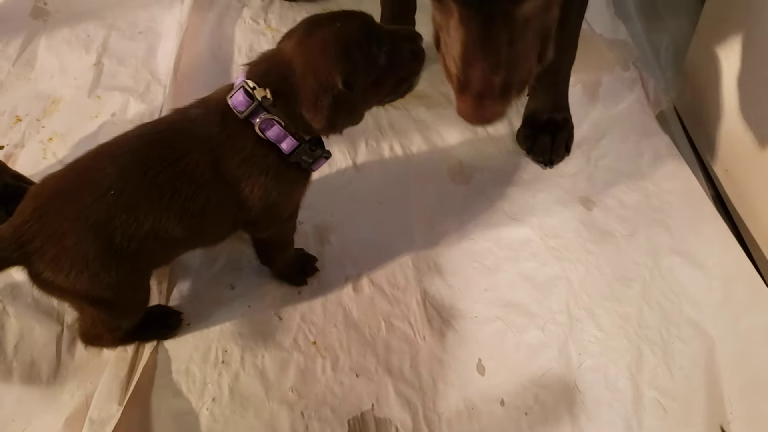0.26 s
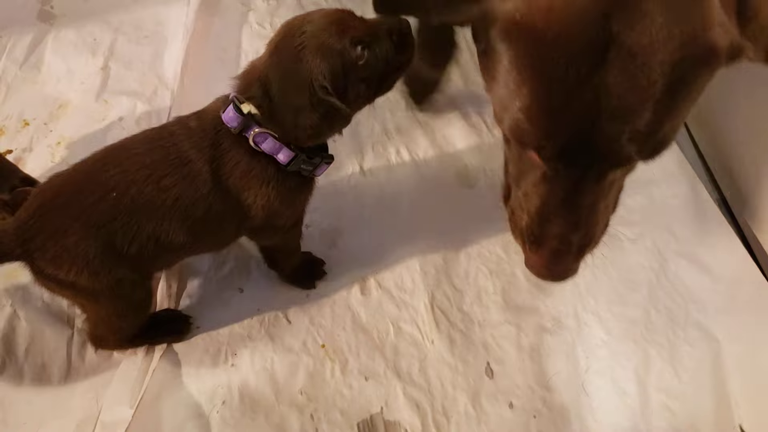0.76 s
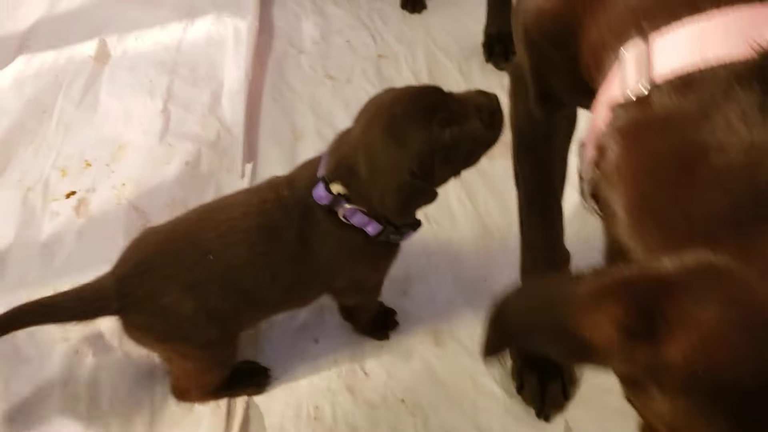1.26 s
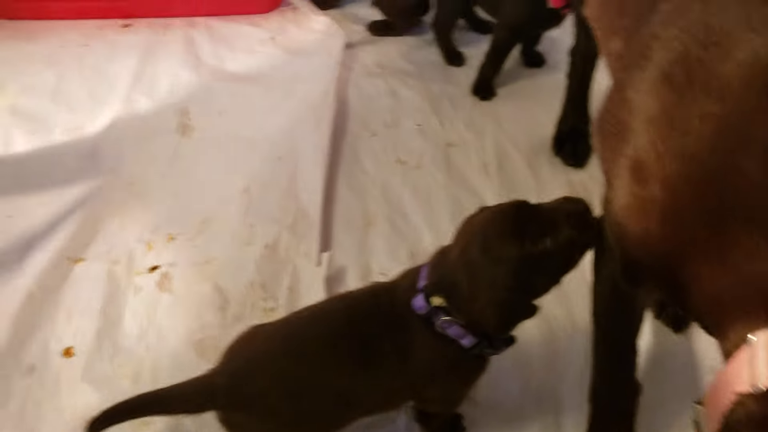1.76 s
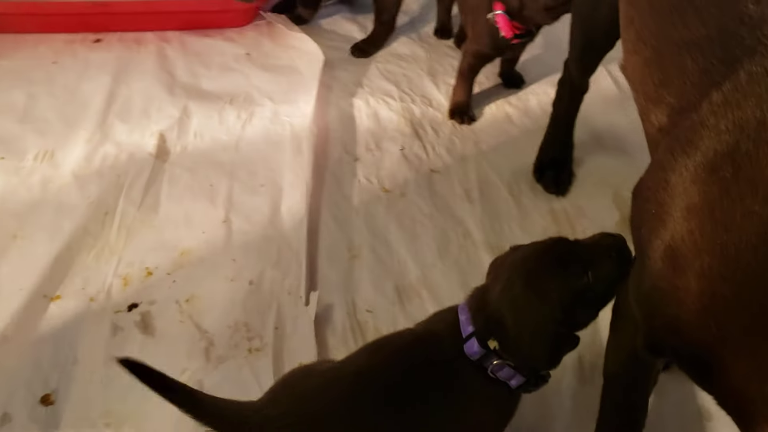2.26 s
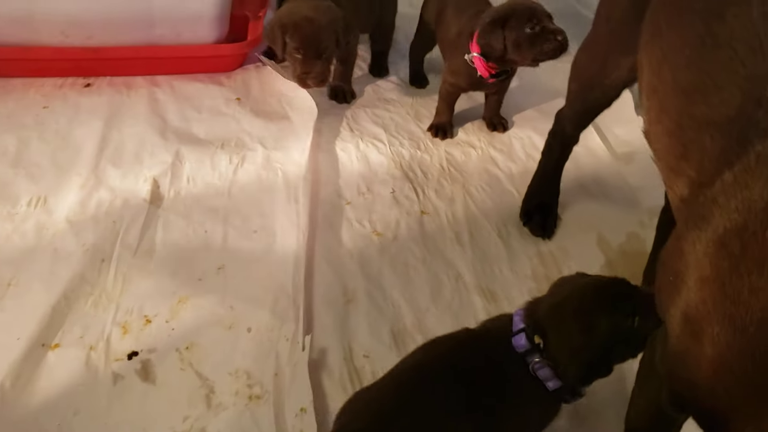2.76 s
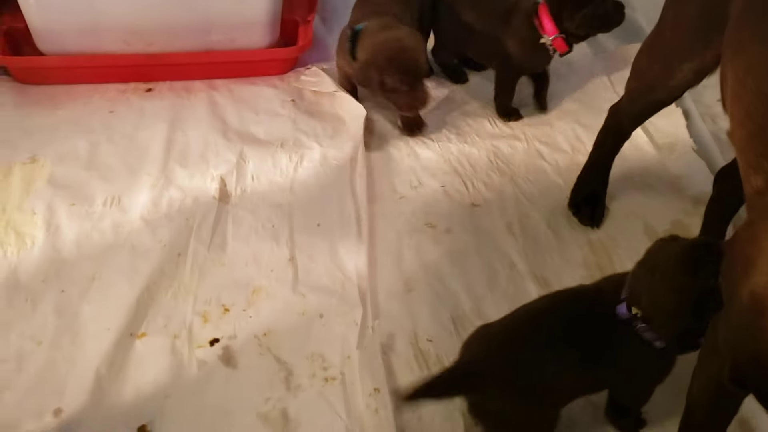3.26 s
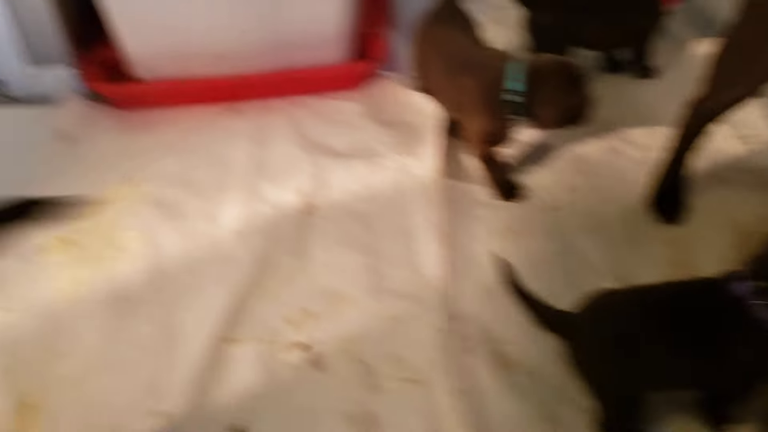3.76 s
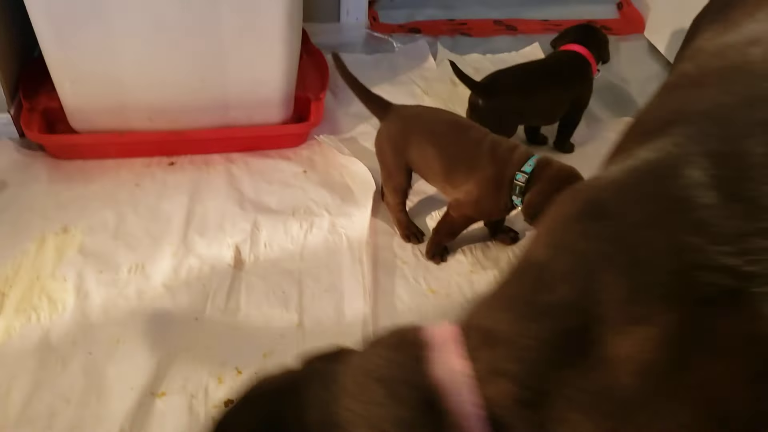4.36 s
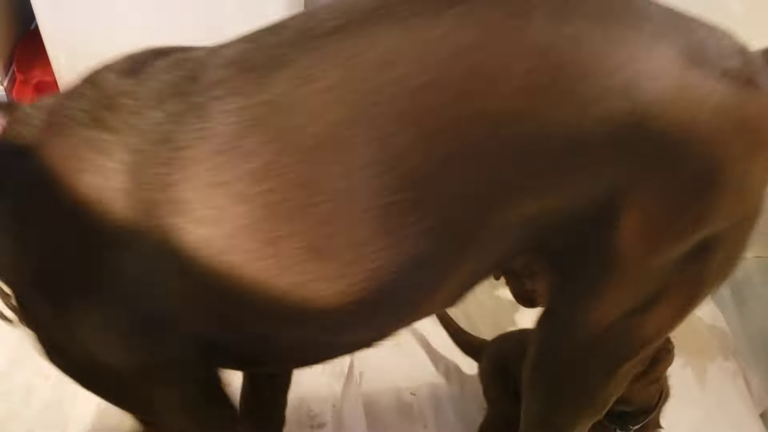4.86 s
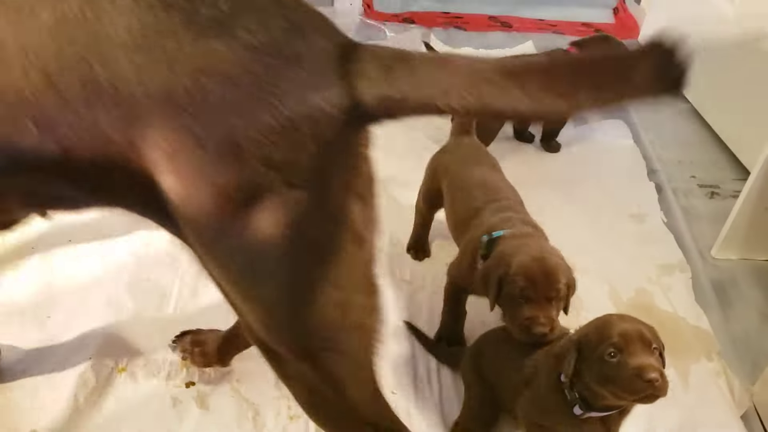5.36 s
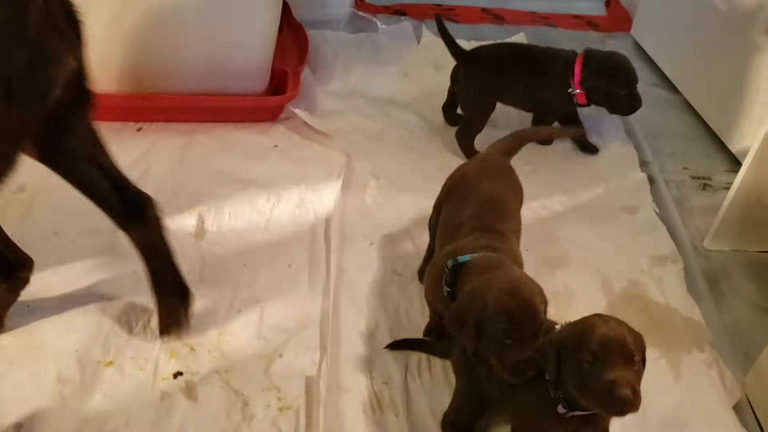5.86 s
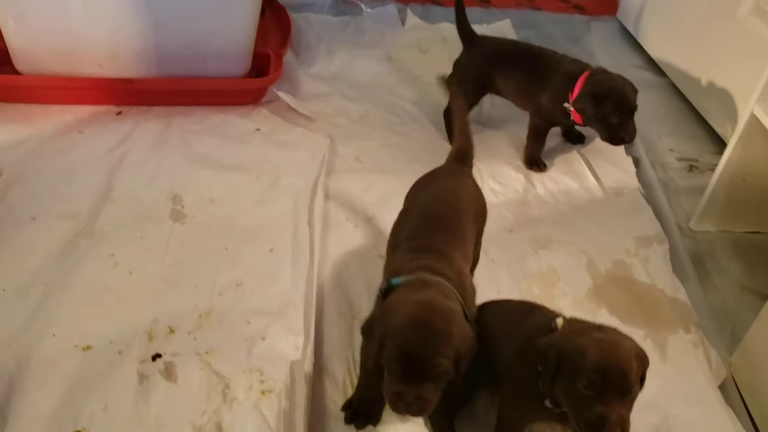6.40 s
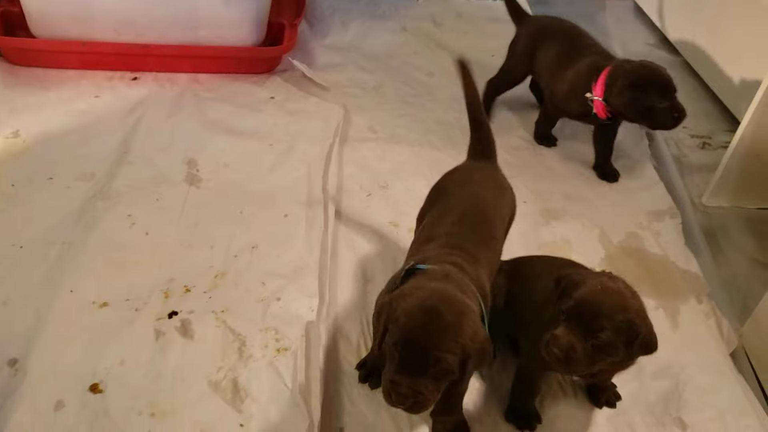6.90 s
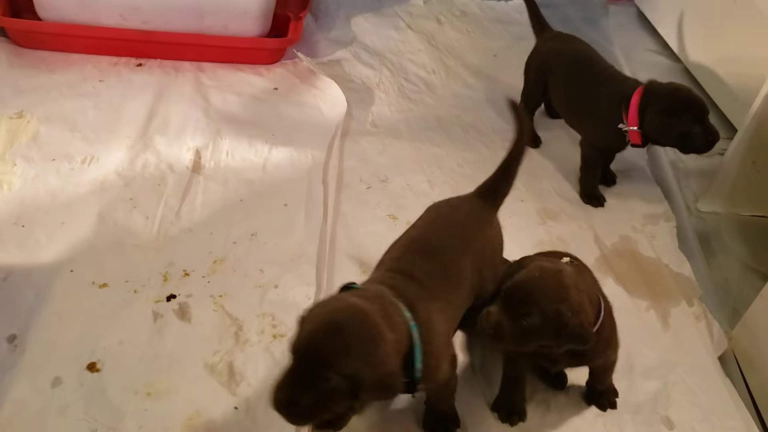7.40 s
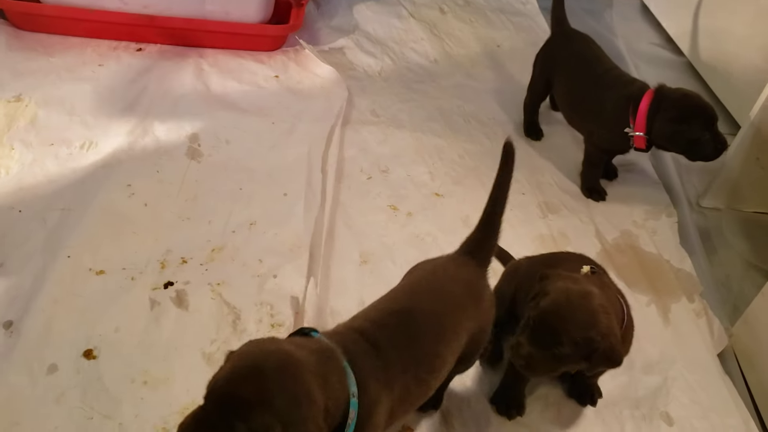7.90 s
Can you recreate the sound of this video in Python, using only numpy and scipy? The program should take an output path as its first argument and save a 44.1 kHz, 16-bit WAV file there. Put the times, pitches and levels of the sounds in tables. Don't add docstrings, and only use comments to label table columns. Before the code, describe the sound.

In a small hard-walled room, puppies and one grown dog walk over a paper-covered floor. Their paws land with short, bright rustles and dry snaps, over soft low thuds. Uneven bursts are separated by tiny pauses. A few very faint squeaks come mid-way, then steps grow denser. A hand-held microphone about a metre away adds low rumble and occasional bumps.

```python
import sys
import numpy as np
from scipy import signal
from scipy.fft import rfft, irfft, next_fast_len
from scipy.io import wavfile
from scipy.ndimage import uniform_filter1d

SR = 44100
rng = np.random.default_rng(int(sys.argv[2]) if len(sys.argv) > 2 else 0)


def wav_record(signal):
    frames = np.transpose(np.atleast_2d(signal))
    bounded = np.clip(frames, -1, 1)
    quanta = np.round(bounded * 32767).astype(np.int16)
    wavfile.write(sys.argv[1], SR, quanta)


def volts(x):
    e = np.asarray(x, float) / 20
    return 10 ** e


N = 358974
TIME = np.arange(N) / SR
FREQ = np.maximum(np.arange(N // 2 + 1) * SR / N, 1)
FAST = next_fast_len(N, True)

ZONE_HZ = [280, 880, 3200, 12300]
ZONE_DB = [-15.5, -2.5, -1, -4]
TREAD_DB = -3
DENSE_DB = -32
DULLEST_HZ = 500
HARD_DB, FOCUS = -45.5, 0.18
FAR_PAWS_DB, FAR_BRIGHT_DB = -55.5, -1
STILL_DB, STILL_TILT_DB = -65.5, 2.5


def paper():
    t, moves, db, bright_db, thuds = treads()
    paused = hush(t)
    shared = creases(400, 3.6, 0.0067)
    heave_db = 2.11 * walk(45)
    pressure = np.interp(TIME, t, volts(2 * db) @ moves)
    dense = pressure / (pressure + volts(2 * DENSE_DB))
    out = 0
    for hz in 140 * 2 ** np.arange(0, 7.1, .5):
        place = np.interp(np.log(hz), np.log(ZONE_HZ), range(4))
        weights = np.maximum(1 - np.abs(place - np.arange(4)), 0)

        crisp = np.clip(0.27 * place, 0, 1)
        grain = 0.1 + .5 * creases(120, 3.3, 0.057 + 25 / hz) + crisp * 0.66 * shared
        uneven = volts(1.87 * walk(30) + heave_db) * grain
        texture = dense + (1 - dense) * uneven

        far = volts(2 * (FAR_PAWS_DB + FAR_BRIGHT_DB * np.log2(hz / 3200)))
        colour_db = bright_db * np.log2(max(hz, DULLEST_HZ) / 3200)
        colour_db = colour_db - FOCUS * (1 - weights[2]) * (db - HARD_DB)
        zone = volts(2 * (TREAD_DB + weights @ ZONE_DB)) * min(hz / ZONE_HZ[0], 1)
        crackle = zone * (volts(2 * (db + colour_db)) @ moves + far)
        steps = (crackle + weights[0] ** 2.0 * thuds) * paused
        rustle = np.interp(TIME, t, steps) * texture

        still = volts(2 * (STILL_DB + STILL_TILT_DB * np.log2(hz / 3000)))
        carrier = hiss(hz, .22, np.clip(.85 - hz / 2200, 0.05, 1))
        out = out + carrier * np.sqrt(linger(rustle + snaps(hz, weights[3]), hz) + still)
    return out * volts(9.5)


# [t/s, level/dB, drag length/s, brightness/dB per octave]
LANDINGS = [(-0.075, -32, 0.06, 0), (0.391, -43, 0.064, 2), (0.544, -44, 0.033, 3.5), (0.666, -50, 0.1, 1),
            (0.74, -40.5, 0.21, 1), (0.76, -35, 0.019, -3), (1.023, -38.5, 0.11, -0.5),
            (1.032, -27, 0.021, 1.7), (1.414, -37.5, 0.027, -3), (1.522, -29.5, 0.049, -0.5),
            (2.214, -48, 0.62, -1), (3.339, -43.5, 0.1, -2), (3.866, -42.5, 0.039, -3.5),
            (4.569, -35.5, 0.1, -0.5), (4.676, -29.5, 0.022, 2.2), (4.806, -41.5, 0.13, -0.5),
            (5.34, -40, 0.22, -1.4), (5.354, -29.5, 0.077, 0.5), (5.404, -23, 0.025, -0.5),
            (5.69, -41, 0.11, 1.5), (5.928, -43, 0.088, -1), (6.243, -37, 0.14, 0), (6.37, -33.5, 0.072, 0),
            (6.668, -33.5, 0.042, 0), (6.776, -40, 0.13, 1.5), (6.986, -36.5, 0.043, 1),
            (7.334, -37, 0.038, -1), (7.499, -45.5, 0.031, -0.7), (7.98, -41.5, 0.3, -2),
            (8.041, -35.5, 0.071, -1.3)]
# [middle t/s, level/dB, half length/s, brightness/dB per octave]
SLIDES = [(1.24, -46, 0.019, 1), (1.502, -46, 0.077, 0.5), (1.765, -48, 0.074, -0.5),
          (2.004, -35.5, 0.033, 0.5), (2.284, -38.5, 0.021, 1), (2.367, -37.5, 0.012, 1.5),
          (2.502, -45.5, 0.032, 0.8), (2.8, -39.5, 0.033, -2), (2.93, -40, 0.092, -0.6),
          (3.075, -46.5, 0.015, -2), (3.3, -47, 0.021, 0), (3.584, -31, 0.024, -0.3),
          (3.747, -46.5, 0.063, 0.5), (3.815, -57, 0.0051, 0), (4.028, -45.5, 0.04, -0.5),
          (4.175, -38, 0.064, -0.8), (4.753, -48, 0.65, -0.8), (5.097, -42.5, 0.013, 1.5),
          (5.208, -43.5, 0.013, 1.5), (5.584, -40, 0.03, 0), (6.08, -38, 0.016, -0.5),
          (6.146, -43.5, 0.012, -1.5), (6.218, -48.5, 0.95, -2.5), (6.75, -45, 0.06, -5),
          (7.136, -37, 0.01, -1.5), (7.216, -38, 0.069, -1.3), (7.624, -40, 0.021, -1.3),
          (7.744, -35.5, 0.036, -1.5), (7.782, -34, 0.02, -1.9), (7.9, -48.5, 0.06, -0.5)]
# [middle t/s, level/dB, half length/s, brightness/dB per octave]
MORE_SLIDES = [(0.16, -49, 0.011, 1.5), (0.496, -53, 0.027, 2), (0.81, -60, 0.015, -1), (1.575, -40, 0.015, -3),
               (2.705, -48, 0.015, -1.5), (3.224, -50.5, 0.027, -3.5), (3.408, -46, 0.056, 1.5),
               (3.546, -50, 0.0068, 8), (4.342, -45.5, 0.017, -1.7), (4.708, -38, 0.01, -3),
               (5.028, -39, 0.012, -3.5), (5.25, -42, 0.014, 1.5), (5.619, -40, 0.017, 3),
               (5.79, -42.5, 0.017, -0.5), (6.466, -42.5, 0.021, 1.5), (6.68, -39, 0.022, 1.5),
               (6.971, -48.5, 0.011, -6.5), (7.342, -58, 0.014, 2), (7.488, -79, 0.062, -10),
               (7.687, -50.5, 0.022, -4.5), (7.84, -46.5, 0.015, -3.5)]
# [t/s, level/dB, hold/s, brightness/dB per octave]
PRESSES = [
    (0.7535, -30, 0.036, 3),
    (4.683, -33, 0.036, 0),
    (6.65, -33.5, 0.027, -3.5),
]
# [t/s, level/dB]
THUDS = [(0.01, -57.5), (0.5, -67), (0.765, -48.5), (1.031, -43), (1.37, -63), (1.53, -58), (1.98, -55),
         (2.33, -49.5), (2.58, -57.5), (2.8, -57), (3.0, -52.5), (3.195, -60), (3.4, -56), (3.57, -48.5),
         (3.9, -51.5), (4.19, -50), (4.68, -50.5), (4.86, -49.5), (5.01, -57), (5.39, -49), (5.7, -92),
         (6.07, -70), (6.3, -58), (6.385, -45), (6.54, -56), (6.66, -53), (6.85, -48.5), (6.98, -47.5),
         (7.13, -47), (7.348, -56), (7.63, -59), (7.72, -58), (8.03, -52)]
LAND_S, PRESS_S = 0.0074, .0015
THUD_RISE_S, THUD_T60_S, THUD_DB = 0.014, 0.42, 5.5


def treads():
    t = TIME[::32]
    s, _, length, _ = np.transpose(LANDINGS)[..., None]
    landings = np.clip((t - s) / LAND_S, 0, 1) * np.exp(-((t - s) / length) ** 2)
    s, _, length, _ = np.transpose(SLIDES + MORE_SLIDES)[..., None]
    slides = np.exp(-.4 * np.abs((t - s) / length) ** 3)
    s, _, hold, _ = np.transpose(PRESSES)[..., None]
    presses = np.clip((t - s) / PRESS_S, 0, 1) * np.exp(-((t - s) / hold) ** 6)
    s, db = np.transpose(THUDS)[..., None]
    decay = volts(2 * (db + THUD_DB) - 120 * np.maximum(t - s, 0) / THUD_T60_S)
    thuds = np.clip((t - s) / THUD_RISE_S, 0, 1) * decay
    _, level_db, _, bright_db = np.transpose(LANDINGS + SLIDES + MORE_SLIDES + PRESSES)
    return t, np.vstack([landings, slides, presses]), level_db, bright_db, thuds.sum(axis=0)


# [middle t/s, change of level/dB, half length/s]
PAUSES = [(0.108, -2.5, 0.03), (0.35, -8, 0.021), (0.64, -4, .04), (0.986, -1.5, .03), (1.39, 0, 0.018),
          (1.8, -2.5, 0.044), (2.187, 3, .025), (2.44, -4.5, 0.021), (3.172, -3, 0.036),
          (3.257, -3, 0.0086), (3.698, -7, 0.014), (3.8, -5, 0.013), (3.975, -2, .013), (4.11, -7, 0.015),
          (4.523, -3.5, 0.032), (4.793, 1.5, 0.015), (5.141, -7, 0.017), (5.296, -10, 0.047),
          (5.626, -6, 0.021), (5.752, -6, 0.022), (5.896, -3, 0.018), (6.205, -6.5, 0.02),
          (6.63, -9.5, 0.022), (6.93, -2.5, 0.038), (7.072, -1, .015), (7.568, -4, 0.028),
          (7.862, -9, 0.014), (7.934, -2.5, 0.034)]


def hush(t):
    s, db, length = np.transpose(PAUSES)[..., None]
    return volts(2 * (db * np.exp(-np.abs((t - s) / length) ** 3)).sum(axis=0))


def creases(per_s, scatter_db, t60):
    chance = rng.random((2, N))
    kicks = np.zeros(N)
    at = chance[0] < per_s / SR
    rarity = np.maximum(chance[1, at], .035)
    kicks[at] = volts(-2 * scatter_db * np.log(rarity))
    power = signal.lfilter([1], [1, -np.exp(-2 * np.log(1000) / (t60 * SR))], kicks)
    return power / power.mean()


# [t/s, peak level/dB, top air level/dB, ringing f/Hz]
SNAPS = [(0.395, -29, -4.5, 5000), (0.755, -23, -18, 4670), (1.039, -30, -19, 2510),
         (1.947, -32.5, -2, 2900), (2.2231, -21.5, -10.5, 4670), (2.4691, -22, -19, 4670),
         (2.6562, -27, -15, 7300), (2.8512, -23.5, -7, 2680), (3.052, -23.5, -8, 4440),
         (3.19, -21.5, -11.5, 4020), (3.27, -29.5, -18, 3000), (3.548, -19.5, -10.5, 4820),
         (3.8088, -20.5, -29, 2920), (3.874, -19.5, -16, 2590), (4.0102, -24, -14, 4640),
         (4.682, -25, -12, 3580), (4.8772, -25.5, -15, 2030), (5.3492, -25, -14, 6140),
         (5.37, -17, -12, 3200), (5.415, -17.5, -10, 3960), (5.689, -19, -21, 4040),
         (5.932, -25, -38, 2820), (6.257, -25, -9, 6050), (6.3768, -26, -3.5, 2900),
         (6.651, -30, -13, 2400), (6.8447, -34.5, 0, 5370), (7, -25.5, -7, 6040), (7.275, -18.5, -11, 3820),
         (7.6982, -22, -8.5, 3880), (7.9792, -27, -14, 4300), (4.156, -29, -8, 2890),
         (6.871, -26.5, -13, 2780), (7.1842, -33, -3, 6000), (7.24, -29, -16, 5000), (3.39, -32, -8, 5000)]
# [t/s, peak
# level/dB, ringing f/Hz]
TICKS = [(0.0948, -38.5, 3200), (0.146, -34.5, 1840), (0.249, -35.5, 4960), (0.2966, -35.5, 4800),
         (0.566, -27, 5390), (0.6437, -35, 3680), (1.1413, -28, 6260), (1.226, -30, 3420),
         (1.4177, -27, 4430), (1.438, -25.5, 4440), (1.5284, -42, 4540), (1.558, -20.5, 4640),
         (1.971, -18, 3760), (2.27, -30, 2950), (2.352, -27.5, 1090), (2.596, -27, 6070),
         (2.7405, -29.5, 3920), (2.794, -25, 2580), (2.939, -21.5, 1300), (3.114, -26, 5210),
         (3.2812, -26, 2610), (3.588, -18, 4440), (4.06, -29, 1410), (4.3322, -29, 2100),
         (4.822, -26, 4930), (4.914, -23, 2080), (6.4442, -19, 3760), (6.672, -17.5, 6250),
         (7.202, -25.5, 3000), (7.737, -19, 2860)]
# [t/s, peak level/dB, ringing f/Hz]
PRICKS = [(0.2134, -43, 2750), (0.671, -37, 2640), (1.1049, -25, 5110), (1.3183, -38, 3130),
          (1.354, -36, 1560), (1.701, -33, 2590), (1.7948, -31.5, 4840), (1.8761, -40, 3920),
          (1.9046, -33.5, 4380), (1.9375, -32, 2920), (2.4536, -32, 1970), (2.699, -34, 1550),
          (3.429, -28, 1610), (3.682, -35, 2410), (3.7194, -34, 3150), (3.9853, -28, 3930),
          (4.123, -37, 4320), (4.45, -32, 3380), (4.5765, -41, 3530), (4.789, -35, 3260),
          (5.0113, -26, 1470), (5.163, -36, 1290), (5.1975, -40, 1300), (5.2886, -32, 6320),
          (5.562, -21.5, 3180), (5.7742, -29, 3580), (6.0553, -30, 2480), (6.207, -30.5, 7180),
          (6.564, -39, 1270), (6.9701, -38, 3070), (7.0844, -32, 2090), (7.1312, -28, 1950),
          (7.3452, -31, 5450), (7.4867, -33.5, 1270), (7.5108, -47, 1930), (7.5275, -38, 2100),
          (7.5951, -38, 2450), (7.612, -28.5, 2020), (7.6802, -26, 1820), (7.769, -23, 4260),
          (7.8845, -34, 1040), (8.0416, -27, 1790)]
SNAP_DB, SNAP_T60_S, TICK_AIR_DB, PRICK_DB = -4.5, .009, -12.5, -2


def snaps(hz, top):
    power, t = np.zeros(N), TIME[:SR // 50]
    crack = volts(-120 * t / SNAP_T60_S) * np.minimum(t / 0.00036, 1)
    small = TICKS + [(s, db + PRICK_DB, f) for s, db, f in PRICKS]
    for s, db, top_db, ring_hz in SNAPS + [(s, db, TICK_AIR_DB, f) for s, db, f in small]:
        fall_db = 3.8 * np.log2(hz / ring_hz) ** 2 / (1 + hz / ring_hz)
        body_db = db + SNAP_DB - fall_db
        air_db = db + top_db + 10.0
        colour_db = (1 - top) * body_db + top * air_db
        add(power, s, volts(2 * colour_db) * crack)
    return power


def flicks():
    out, t = np.zeros(N), TIME[:SR // 100]
    for s, db, _, hz in SNAPS:
        add(out, s, volts(db - 13 - 60 * t / .003) * np.sin(2 * np.pi * hz * t))
    return out


# [t/s, level/dB, start f/Hz, end f/Hz, length/s]
SQUEAKS = [(1.729, -49, 495, 460, 0.011), (2.095, -36, 910, 880, 0.006), (2.104, -48, 920, 870, 0.065),
           (2.348, -44, 1116, 1070, 0.036), (4.185, -52, 121, 264, 0.028), (4.333, -44, 232, 214, 0.055),
           (4.402, -36, 636, 650, 0.017), (4.424, -47, 665, 680, .045), (4.455, -51, 560, 545, .06),
           (4.46, -56, 374, 400, 0.1), (4.472, -48, 700, 760, .035), (4.508, -51, 750, 660, .03),
           (5.294, -38.5, 735, 765, .024), (5.32, -45, 770, 800, .035), (4.52, -53, 400, 430, .05),
           (4.562, -51, 570, 570, .02), (4.378, -47, 440, 600, .016), (5.84, -52, 680, 680, .022)]
# [t/s, level/dB, f/Hz, length/s]
RASPS = [(1.187, -54, 1480, 0.0072), (1.71, -55, 1145, 0.019), (1.729, -44.5, 775, 0.0084),
         (1.742, -48.5, 310, 0.0053), (2.094, -45.5, 954, 0.0075), (4.242, -42.5, 1210, 0.015),
         (4.313, -48, 615, 0.0076), (4.386, -48, 470, 0.018), (4.5, -57, 522, 0.067),
         (4.873, -35, 2035, 0.019), (5.366, -48, 910, 0.012), (6.074, -49.5, 836, 0.035),
         (6.139, -51, 500, 0.024), (6.998, -37, 3100, .008), (6.999, -44, 5980, .008),
         (7.493, -53, 1290, 0.014)]
# [t/s, level/dB, f/Hz]
PLEATS = [(0.0, -54, 136), (0.405, -45, 1740), (0.495, -58, 136), (0.77, -30, 2360), (0.771, -22.5, 3880),
          (0.788, -52, 250), (1.035, -29, 2485), (1.058, -41, 1300), (1.579, -53, 190), (2.016, -45, 4370),
          (2.277, -43, 2930), (2.313, -56, 208), (2.352, -51, 124), (2.595, -57, 120), (4.698, -45.5, 258),
          (4.875, -40, 985), (4.91, -37, 2100), (5.409, -32, 1200), (5.41, -35, 2200), (5.412, -28, 3980),
          (5.418, -25.5, 1660), (5.421, -33, 990), (5.65, -50, 3230), (5.943, -31, 2900), (6.101, -57, 250),
          (6.14, -45, 2380), (6.17, -60, 220), (6.396, -49, 149), (6.437, -46, 340), (6.553, -53, 299),
          (6.675, -38, 960), (6.677, -39, 1400), (7.29, -38, 3660), (7.711, -39.5, 3840),
          (7.734, -34, 2840), (7.737, -30, 4300)]
SQUEAK_BREATH, RASP_BREATH, PLEAT_BREATH = .2, 1, .25
PLEAT_S, PLEAT_CYCLES = 0.017, 2.1


def squeaks():
    out, air = np.zeros(N), walk(500) + 1j * walk(500)
    waver = np.repeat(air, 4)[:N]
    calls = [row + (SQUEAK_BREATH,) for row in SQUEAKS]
    calls += [(s, db, f, f, length, RASP_BREATH) for s, db, f, length in RASPS]
    calls += [(s, db, f, f, PLEAT_S + PLEAT_CYCLES / f, PLEAT_BREATH) for s, db, f in PLEATS]
    for s, db, start_hz, end_hz, length, breath in calls:
        t = TIME[:int(2 * length * SR)]
        phase = 2 * np.pi * np.cumsum(start_hz + (end_hz - start_hz) * t / length) / SR
        shape = np.minimum(t / min(0.22 * length, .007), 1) * np.exp(-1.5 * (t / length) ** 3)
        noise = air if breath == RASP_BREATH else waver
        voice = 1 - breath + breath * noise[int(s * SR):][:len(t)]
        add(out, s, volts(db) * shape * np.imag(voice * np.exp(1j * phase)))
    return out


# [t/s, level/dB]
GRIP = [(0.0, -64), (0.34, -69), (0.52, -58), (0.68, -72), (1.12, -54), (1.3, -62), (2.08, -66), (2.4, -52),
        (2.6, -64.5), (3.67, -62), (3.8, -59), (4.05, -58), (4.33, -58.5), (5.5, -77), (6.28, -78),
        (6.5, -63), (7.4, -68), (8.14, -79)]
# [t/s, level/dB, push length/s, ring T60/s, signed push: inward -, outward +]
KNOCKS = [
    (3.762, -23.5, 0.004, 0.12, -1.1),
    (3.896, -22.5, 0.0038, 0.21, -0.97),
    (4.015, -30, 0.0015, 0.096, -1),
    (4.0641, -15.5, 0.00034, .002, 0.88),
    (4.0654, -12, 0.00089, 0.067, -0.93),
    (7.175, -24, 0.00054, 0.011, 0.87),
]
# [t/s, level/dB, length/s, f/Hz]
SWAY = (7.13, -25, .042, 64)
# [start t/s, level/dB, length/s, f/Hz]
ROCKS = [(0.198, -49, 0.093, 45), (0.796, -46.5, 0.12, 55), (1.031, -51, 0.072, 90),
         (1.146, -42.5, 0.052, 84.5), (2.397, -41, 0.05, 65), (2.464, -43, .03, 70),
         (3.812, -33.5, .045, 60), (3.973, -39.5, .04, 62), (6.469, -40.5, 0.027, 55),
         (1.527, -48, .07, 59.5), (1.762, -42, 0.044, 50), (1.987, -42, 0.083, 50), (2.21, -44, 0.055, 45),
         (2.7, -52, .07, 69.6), (2.834, -66, .09, 60), (3.576, -46, 0.049, 50), (4.85, -44, 0.065, 55.4),
         (4.984, -56, 0.081, 49.4), (5.17, -59, 0.073, 50), (5.47, -55, .07, 60), (5.676, -55, 0.073, 55),
         (6.664, -44, 0.058, 55), (6.84, -53, 0.068, 60), (7.36, -45, 0.1, 49), (7.84, -47, 0.044, 64.5)]
CASE_HZ = 61.7


def grip():
    s, db = np.transpose(GRIP)
    swell_db = np.minimum(np.interp(TIME, s, db), -49) + 3.3 * walk(17) - 0.5
    swell = volts(swell_db) + volts(-68.0)
    rumble = unit(hiss(62, .75, 0.65)) * volts(np.array([[-7], [3]])) * swell
    knocks, t = np.zeros(N), TIME[:SR // 4]
    for s, db, push, t60, way in KNOCKS:
        after = t - 2 * push
        dent = np.exp(-.5 * (after / (.5 * push)) ** 2)
        swing = -.8 * np.sin(2 * np.pi * CASE_HZ * after) * volts(-60 * t / t60) * (after > 0)
        add(knocks, s - 2 * push, volts(db) * way * (dent + swing))
    for s, db, length, hz in [SWAY] + ROCKS:
        shape = np.sin(np.pi * np.minimum(t / length, 1)) ** .5
        add(knocks, s, volts(db) * shape * -np.sin(2 * np.pi * hz * t))
    return rumble + knocks * volts(np.array([[-24], [0]]))


ROOM_T60_S, ROOM_DB, SQUEAK_ROOM_DB = 0.17, -1, -10


def room(dry):
    t = TIME[:int(.6 * SR)]
    tail = rng.standard_normal((2, len(t))) * volts(-60 * t / ROOM_T60_S) * (t > .004)
    tail /= np.sqrt((tail ** 2).sum(axis=1, keepdims=True))
    return dry + volts(SQUEAK_ROOM_DB) * signal.fftconvolve(dry, tail, axes=1)[:, :N]


def linger(power, hz):
    keep = np.exp(-2 * np.log(1000) / (ROOM_T60_S * (hz / 1000) ** -.15 * SR))
    late = np.roll(power, int(0.00076 * SR))
    return power + volts(2 * ROOM_DB) * signal.lfilter([1 - keep], [1, -keep], late)


# [f/Hz, left level/dB, right level/dB]
PORTS = [(84, 14.5, 14), (221, 2.5, 1), (425, 2.5, -1), (750, -1, -6), (1300, 0, -3.5), (4230, 0, -5.5),
         (5390, -2.5, -1), (7900, -2, -19.5), (7870, -5, -28), (8900, -9.5, -15), (10680, -3, -6),
         (11700, -3.5, -4), (14000, -3, -9.5), (15900, -2, -37)]
# [f/Hz, width/Hz, level/dB]
FLOOR_MODES = [(226, 61, 7.5), (647, 25, 6)]


def ports(air):
    hz, *db = np.transpose(PORTS)
    air = np.array([np.roll(air[0], 8), air[1]])
    lift_db = sum(d / (1 + (2 * (FREQ - f) / w) ** 2) for f, w, d in FLOOR_MODES)
    port_db = np.array([np.interp(np.log(FREQ), np.log(hz), d) for d in db])
    return irfft(rfft(air) * volts(lift_db + port_db), N)


def hiss(hz, octaves, alike):
    low = int(hz * 2 ** (-3 * octaves) * FAST / SR)
    high = int(min(hz * 2 ** (3 * octaves) / SR, .5) * FAST)
    f = np.arange(low, high)
    draw = rng.standard_normal((3, len(f))) + 1j * rng.standard_normal((3, len(f)))
    bell = np.exp(-.5 * (np.log2(f * SR / FAST / hz) / octaves) ** 2)
    mixed = np.sqrt(alike) * draw[0] + np.sqrt(1 - alike) * draw[1:]
    spectrum = np.zeros((2, FAST // 2 + 1), complex)
    spectrum[:, f] = mixed * bell * np.sqrt(FAST / 2)
    return irfft(spectrum, FAST)[:, :N]


def walk(rate):
    k = int(SR / rate)
    held = np.repeat(rng.standard_normal(N // k + 1), k)
    return 2.21 * uniform_filter1d(uniform_filter1d(held, k), k)[:N]


def unit(x):
    return x / np.sqrt(np.mean(x ** 2))


def add(track, s, sound):
    i = int(s * SR)
    track[..., i:i + sound.shape[-1]] += sound[..., :track.shape[-1] - i]


def scene():
    return ports(paper() + flicks() + room(squeaks()[None])) + grip()


def thin_out(x, under_db):
    cells = signal.stft(x, nperseg=1024)[2]
    power = np.abs(cells) ** 2
    around = uniform_filter1d(power, size=170, axis=1)
    weak = uniform_filter1d(power, size=5, axis=1) < volts(2 * under_db) * around
    weak[:, :100] = False
    return signal.istft(cells * ~weak, nperseg=1024)[1][:, :N]


def low_pass(x):
    return signal.sosfilt(signal.butter(12, 16800, fs=SR, output="sos"), x)


def record(dry):
    x = signal.sosfilt(signal.butter(2, 35, "high", fs=SR, output="sos"), dry)
    x = thin_out(x, under_db=-11)
    x = signal.sosfilt(signal.ellip(10, .2, 46, 15900, fs=SR, output="sos"), x)
    return low_pass(x)


dry = scene()
out = record(dry)
wav_record(out)
```